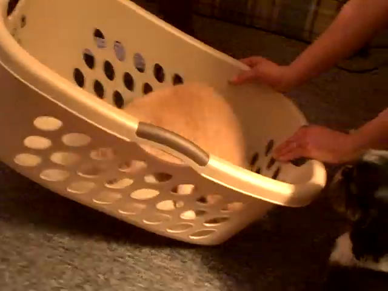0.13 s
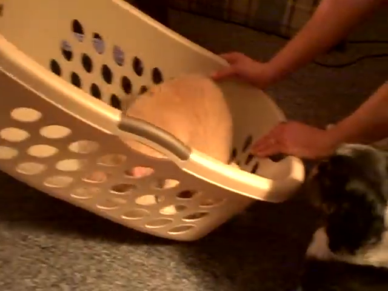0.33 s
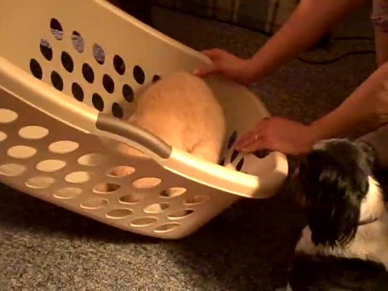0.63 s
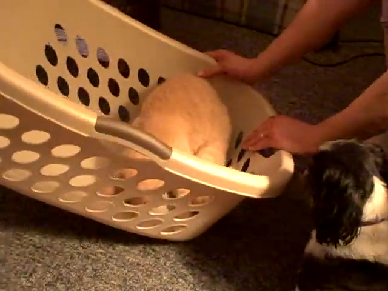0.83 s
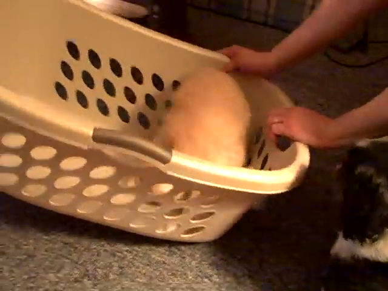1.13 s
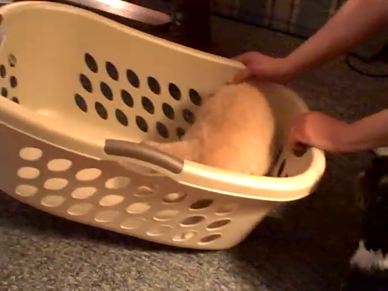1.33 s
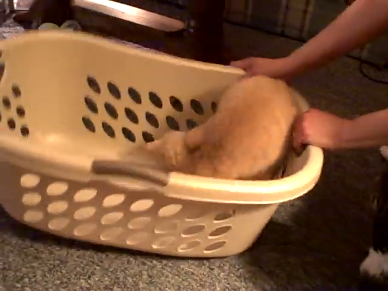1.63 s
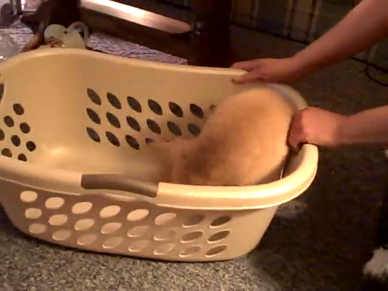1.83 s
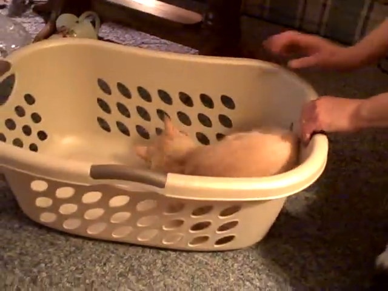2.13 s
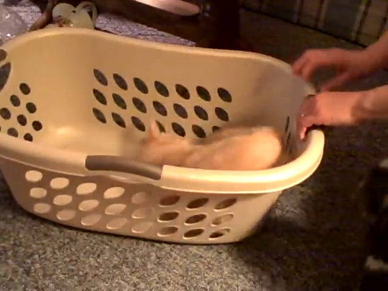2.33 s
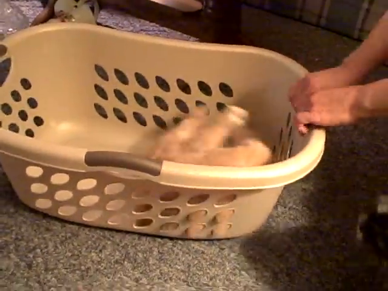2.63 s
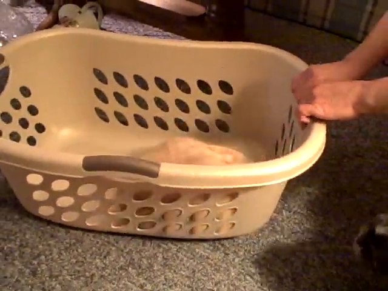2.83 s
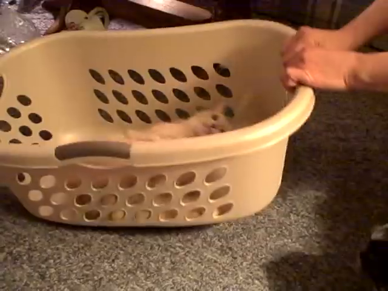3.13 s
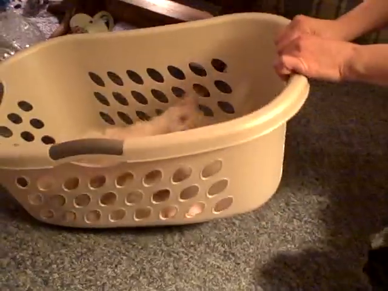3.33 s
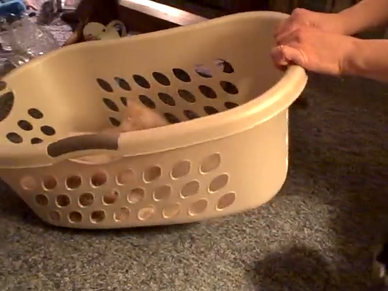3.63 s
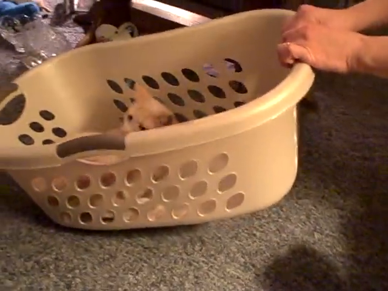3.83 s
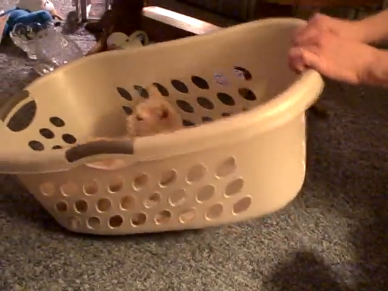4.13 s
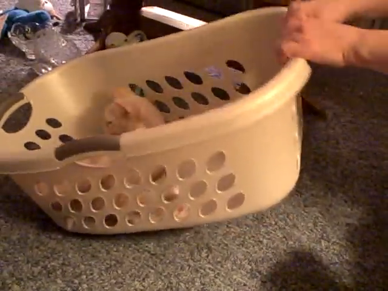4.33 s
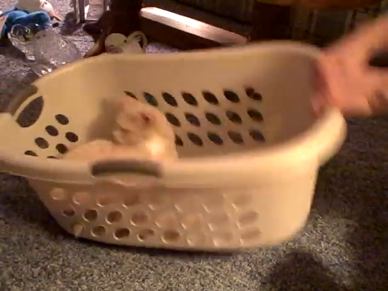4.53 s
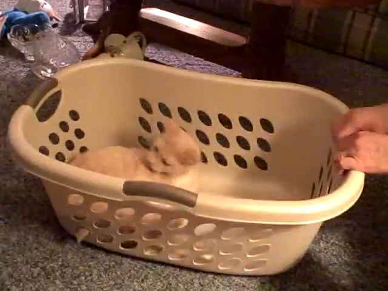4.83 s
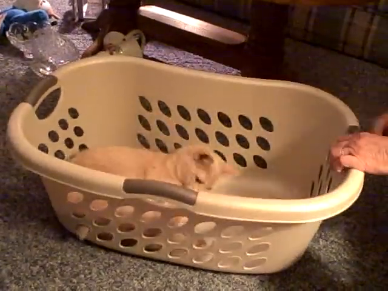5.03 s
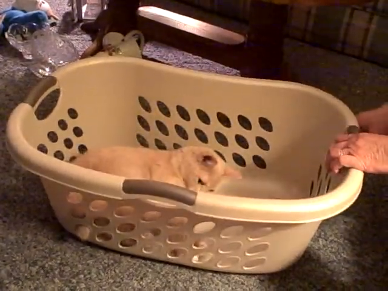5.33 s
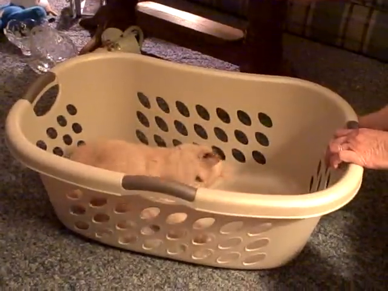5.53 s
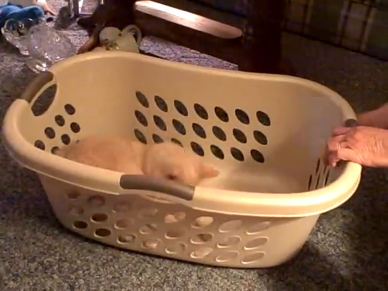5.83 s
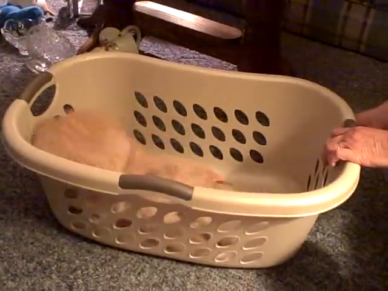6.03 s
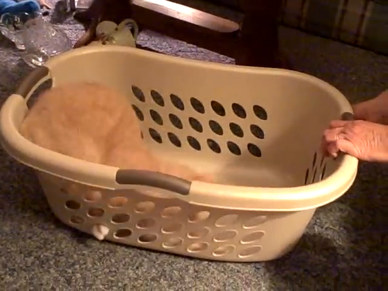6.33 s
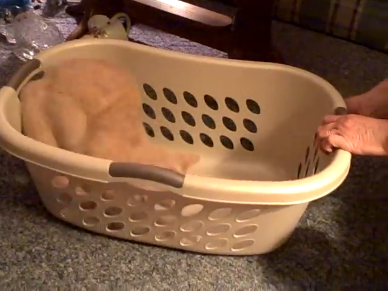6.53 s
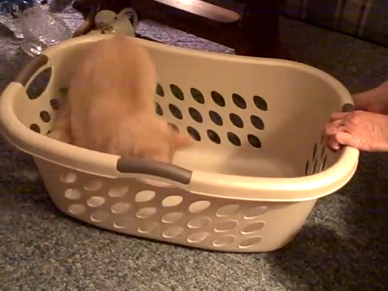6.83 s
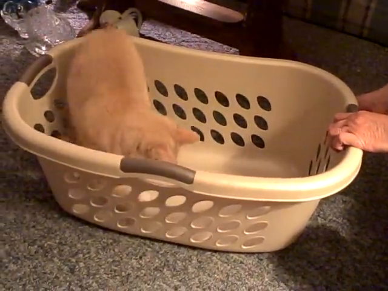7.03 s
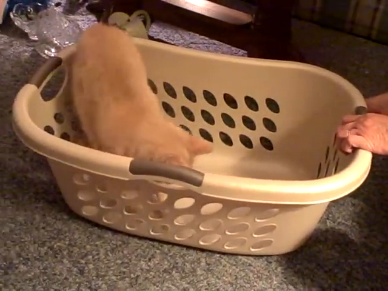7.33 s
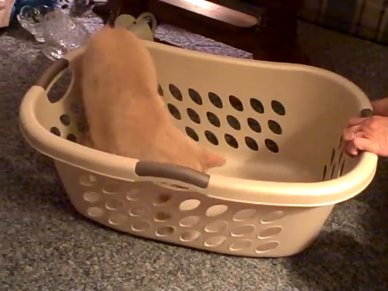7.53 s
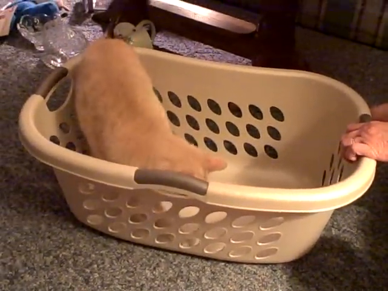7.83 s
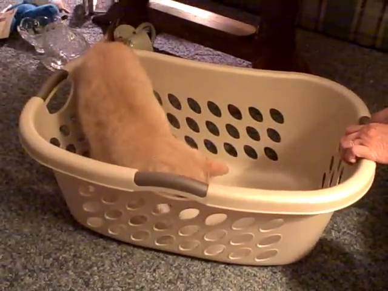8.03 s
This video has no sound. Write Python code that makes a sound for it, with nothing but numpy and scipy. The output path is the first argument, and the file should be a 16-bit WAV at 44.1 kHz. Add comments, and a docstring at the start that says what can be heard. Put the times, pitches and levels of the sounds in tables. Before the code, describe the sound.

A cat slides and scrabbles inside a hollow plastic laundry basket on carpet, soft brushing at first, then thickening claw scratches and knocks.

```python
"""A cat slides and scrabbles in a plastic laundry basket on a carpet, in a quiet room.
Low rumble and faint hiss run throughout. First fur slides in strokes of tiny slips, with scattered claw catches,
soft thuds and, from 2 s, slow deep heaves. After a sparser stretch near 4 s the scrabbling thickens from 5.3 s to
the end: claws tick and ring the wall modes, panels knock at three pitches, hard drags squeak as gliding noise bands.
A short room tail follows the contacts; a small microphone with a bright treble peak picks everything up."""
import sys
import numpy as np
from scipy import signal
from scipy.fft import rfft, irfft
from scipy.io import wavfile
from scipy.ndimage import uniform_filter1d, map_coordinates

SR = 44100
rng = np.random.default_rng(int(sys.argv[2]) if len(sys.argv) > 2 else 0)


def put_to_file(sound):
    """Save the sound as 16-bit audio at rate SR, in the file named by the first command-line argument."""
    columns = np.atleast_2d(sound).T  # one column per channel
    safe = np.clip(columns, -1, 1)
    whole_steps = np.round(safe * 32767)
    wavfile.write(sys.argv[1], SR, whole_steps.astype(np.int16))


N = 360738
TIME = np.arange(N) / SR

# claws catching on the plastic: t/s, relative tick level/dB, relative wall ring level/dB, slip length/s,
# favoured f of the spot/Hz
CLAW_CATCHES = [(0.5468, -38, -38.5, 0.0015, 1900), (1.159, -38, -60, 0.0019, 1592),
                (1.479, -41.5, -44, 0.0015, 2200), (1.96, -31, -67, 0.0092, 2520),
                (2.019, -43, -43, 0.0044, 1200), (2.612, -40.5, -46, 0.0037, 1700),
                (4.706, -54, -44, 0.0017, 1298), (5.294, -47, -42, 0.0041, 897),
                (5.376, -48.5, -44, 0.0046, 800), (5.388, -32, -38, 0.0133, 2000),
                (5.646, -23, -38.5, 0.0014, 1600), (5.664, -31.5, -39.5, 0.0023, 1100),
                (5.731, -42, -51, 0.0032, 1787), (5.812, -34, -45, 0.0059, 905),
                (5.969, -41, -46.5, 0.0012, 1600), (6.021, -34, -39, 0.0015, 1032),
                (6.113, -32, -51, 0.0013, 2640), (6.149, -47, -43, 0.0031, 1920),
                (6.203, -48, -46, 0.0011, 1200), (6.275, -46, -45, 0.00185, 1750),
                (6.322, -33, -56, 0.0013, 2600), (6.394, -34, -36, 0.0042, 1560),
                (6.469, -47, -44.5, 0.006, 2250), (6.523, -31, -65, 0.0088, 1574),
                (6.588, -40, -43, 0.00114, 650), (6.862, -39, -47, 0.0055, 2180),
                (6.953, -22, -26, 0.0039, 1900), (6.964, -21, -33, 0.00337, 2500),
                (7.028, -30, -60, 0.0044, 1480), (7.19, -33.5, -42, 0.0011, 1300),
                (7.223, -28, -34, 0.0062, 2330), (7.238, -32.5, -36.5, 0.005, 2400),
                (7.403, -33, -38.5, 0.0023, 900), (7.434, -32.5, -40.5, 0.0022, 1372),
                (7.521, -20, -30.5, 0.005, 2200), (7.648, -38, -55, 0.002, 2020),
                (7.749, -31.5, -34, 0.0056, 2066), (8.005, -44, -42.5, 0.0031, 1100),
                (8.036, -49, -42.5, 0.00084, 700), (8.1269, -22, -44.5, 0.0041, 2695)]
# blunt blows on a panel: t/s, relative level/dB, low ring f/Hz, middle ring f/Hz, high ring f/Hz,
# step of each ring against the one below/dB
PANEL_KNOCKS = [(0.547, -36, 670, 1660, 1910, 2.5), (4.689, -46, 760, 1220, 1500, 6),
                (5.295, -41.5, 323, 502, 870, 3.5), (6.021, -39.5, 750, 1190, 1508, 1.5),
                (6.9533, -22.5, 793.7, 1370, 1750, -0.5), (6.964, -34.5, 790, 1426, 2420, 6),
                (7.224, -35, 1913, 2560, 3800, 3), (7.2398, -32, 856, 1310, 1810, 3.5),
                (7.5232, -26, 1296, 2200, 3940, 4), (8.128, -25.5, 1780, 2560, 3950, 4)]
# surface scrape spectrum: f/Hz, relative level/dB
SCRAPE_SPECTRUM = [(100, -5), (400, -6.5), (1000, -11), (2000, -4), (3200, -2.5), (4500, 2), (6500, 3),
                   (9000, -2.5)]
SHIFTING_HZ = 1720  # favoured pitch of the wall the cat leans on


def undb(db):
    """Decibels to gain."""
    return 10 ** (np.asarray(db) / 20)


def unit(x):
    """Scale to rms 1."""
    return x / np.sqrt(np.mean(x ** 2))


def unit_energy(x):
    """Scale so that the squares sum to 1."""
    return x / np.sqrt(np.sum(x ** 2))


def add(out, start_s, x):
    """Mix x into out from start_s."""
    start = int(np.clip(start_s * SR, 0, N - 1))
    out[start:start + len(x)] += x[:N - start]


def colour(x, spectrum, size=8192):
    """Minimum-phase filter through (Hz, dB) points, built from the cepstrum."""
    hz, db = np.transpose(spectrum)
    bins_hz = np.arange(size // 2 + 1) * SR / size
    response_db = np.interp(np.log(bins_hz + 1), np.log(hz), db)
    cepstrum = irfft(np.log(undb(response_db)))[:size // 2]
    cepstrum[1:] *= 2  # fold to causal
    impulse = irfft(np.exp(rfft(cepstrum, size)))[:size // 2]
    return signal.fftconvolve(x, impulse)[:len(x)]


def walk(rate_hz):
    """Random levels drawn at rate_hz, slewed from one to the next; rms 1."""
    hold = int(SR / rate_hz)
    steps = np.repeat(rng.standard_normal(N // hold + 1), hold)
    return unit(uniform_filter1d(steps, hold)[:N])


def fade(t60_s, size=12000):
    """Exponential decay at 60 dB per t60_s, cut after size samples."""
    return np.exp(-np.log(1000) * TIME[:size] / t60_s)


def ring(modes, scatter_db, detune):
    """Sum of damped modes; every contact weights, detunes and signs them at random."""
    out = 0
    draws = rng.standard_normal((len(modes), 3))
    for (hz, db, t60_s), (size, stretch, side) in zip(modes, draws):
        decay = fade(t60_s)
        bent_hz = hz * (1 + detune * stretch)
        gain = np.sign(side) * undb(db + scatter_db * size)
        out = out + gain * decay * np.sin(2 * np.pi * bent_hz * TIME[:len(decay)])
    return unit_energy(out)


def favour(hz, spot_hz, slope_db=6):
    """A spot passes vibration best near its own pitch: gain in dB at hz, slope_db per squared octave, limited."""
    return -slope_db * np.minimum(np.log2(hz / spot_hz) ** 2, 2)


def wall(force, spot_hz, flex_db, scatter_db, damping=1):
    """A force at one spot rings the wall's modes and drives a dense, quickly damped flexing around it."""
    # wall modes: f/Hz, relative level/dB, t60 before damping/s
    wall_modes = [(501, -5.5, 0.38), (573, -6, 0.16), (676, -9, 0.23), (784, -8.5, 0.058),
                  (862, -2.5, 0.18), (987, -11, 0.05), (1260, -4, 0.029), (1440, -2.5, 0.05),
                  (1607, 2, 0.06), (1852, 10, 0.025), (2140, -8.5, 0.05), (2330, -9, 0.037),
                  (2590, -5, 0.047), (2850, -4, 0.057), (3780, 3, 0.019), (4493, -3, 0.049)]
    # wall flexing spectrum: f/Hz, relative level/dB
    shell_spectrum = [(90, -21), (240, -5.5), (380, -1), (750, 5), (1050, 0), (1600, -3), (2600, -1),
                      (4000, 0), (6500, -6.5), (9000, -20.5)]
    spot_modes = [(hz, db + favour(hz, spot_hz), t60_s / damping) for hz, db, t60_s in wall_modes]
    modes = ring(spot_modes, scatter_db, detune=0.013)
    flex = colour(force, [(hz, db + favour(hz, spot_hz)) for hz, db in shell_spectrum])
    ringing = signal.fftconvolve(force, modes)[:len(force)]
    return unit_energy(ringing) + undb(flex_db) * unit_energy(flex)


def rubbing(hiss_db=-1, rasp_db=-1.0, judder_db=1.0, flicker_db=4.5, reach_octaves=0.98, grit_db=-6,
            flutter_db=1.26):
    """Fur and claws slide over the plastic: the slips hiss at the surface and rasp in the walls."""
    hiss_gain, rasp_gain, spot_octaves = contact()
    hiss_gain = hiss_gain * undb(flutter_db * walk(rate_hz=30))
    judder = undb(judder_db * walk(rate_hz=160))
    friction = unit(slips(rate_hz=7000, spread_db=1.5) * judder)
    # claw tips skip in fewer, larger steps than fur
    skips = unit(friction + 0.55 * slips(rate_hz=600, spread_db=5.5))
    # contact wanders over five spots, soft to stiff; pressure on each flickers
    spots_hz = np.geomspace(550, 3000, 5)
    place = spot_octaves + 0.18 * walk(rate_hz=10)
    shares = np.exp(-((place - np.log2(spots_hz)[:, None]) / reach_octaves) ** 2)
    shares /= np.linalg.norm(shares, axis=0)
    walls = np.zeros(N)
    for hz, share in zip(spots_hz, shares):
        pressed = skips * undb(flicker_db * walk(rate_hz=55))
        # the body on the wall damps its modes, so mostly the flexing is heard
        walls += share * unit(wall(pressed, hz, flex_db=1.5, scatter_db=3, damping=2))
    # claw tips tick over scuffs, louder with the rasp
    grit = undb(grit_db) * unit(colour(slips(rate_hz=430, spread_db=6), SCRAPE_SPECTRUM))
    surface = unit(colour(friction, SCRAPE_SPECTRUM))
    return undb(hiss_db) * hiss_gain * surface + undb(rasp_db) * rasp_gain * (bend(walls) + grit)


def slips(rate_hz, spread_db):
    """Stick-slip friction: a random stream of tiny impulses, a few much larger than the rest."""
    sizes = undb(spread_db * np.minimum(rng.exponential(size=N), 4))
    return unit((rng.random(N) < rate_hz / SR) * sizes * rng.choice([-1, 1], N))


def contact():
    """Strokes add in power to a hiss gain and a rasp gain; rasp power weights the spot, in octaves."""
    # light rubbing under all strokes: t/s, surface hiss level/dB, wall rasp level/dB
    shifting = [(0.0, -81.5, -95), (0.45, -62, -77.5), (0.72, -74, -87), (1.1, -59, -74),
                (1.36, -60.5, -67.5), (2.2, -61.5, -70), (3.301, -57.5, -69), (3.75, -63, -75),
                (4.6, -64.5, -72), (4.8, -59.5, -64.5), (5.27, -61.5, -65), (5.451, -48, -52),
                (6.4, -52.5, -58), (6.52, -53, -62), (6.82, -51.5, -61), (6.9, -52, -70), (7.1, -82, -53.5),
                (7.35, -71, -64), (7.8, -43, -62.5), (7.969, -56, -60), (8.18, -41.5, -67)]
    s, *columns = np.transpose(shifting)
    hiss, rasp = (undb(np.interp(TIME, s, column)) ** 2 for column in columns)
    octaves = rasp * np.log2(SHIFTING_HZ)
    for start_s, envelope, hiss_db, rasp_db, spot_hz in strokes():
        power = (undb(rasp_db) * envelope) ** 2
        add(hiss, start_s, (undb(hiss_db) * envelope) ** 2)
        add(rasp, start_s, power)
        add(octaves, start_s, power * np.log2(spot_hz))
    return np.sqrt(hiss), np.sqrt(rasp), octaves / rasp


def strokes():
    """Yield (s, envelope, hiss dB, rasp dB, pitch Hz): slides hold, scratches swell, skids die away."""
    # fur sliding along the plastic: t/s, length/s, relative level/dB
    fur_slides = [(0.007, 0.2112, -46.5), (0.26, 0.052, -52.5), (0.497, 0.062, -57.5), (0.96, 0.04, -47),
                  (1.596, 0.159, -52.5), (1.751, 0.089, -50), (1.815, 0.24, -46), (2.289, 0.062, -56),
                  (2.471, 0.13, -43), (2.614, 0.36, -52.5), (2.855, 0.19, -45), (3.04, 0.18, -47.5),
                  (3.213, 0.17, -47), (3.362, 0.23, -50), (3.58, 0.0665, -54.5), (4.263, 0.26, -55),
                  (4.757, 0.13, -52.5), (5.544, 0.036, -36.5), (6.304, 0.15, -38.5), (6.653, 0.11, -41),
                  (6.746, 0.046, -38.5), (6.957, 0.1, -33), (7.215, 0.21, -41), (7.436, 0.096, -45),
                  (7.629, 0.16, -35.5), (7.778, 0.12, -45), (7.99, 0.14, -42.5)]
    # strokes of a paw: t/s, length/s, surface hiss level/dB, wall rasp level/dB, favoured f of the spot/Hz
    paw_strokes = [(0.538, 0.07, -49.5, -49, 1600), (0.787, 0.078, -53, -52, 1200),
                   (1.102, 0.045, -43.5, -58, 2500), (1.154, 0.0545, -42.5, -47.5, 2680),
                   (1.232, 0.073, -58, -57.5, 1505), (1.476, 0.024, -44, -58, 1910),
                   (2.49, 0.133, -42.5, -52, 2300), (2.907, 0.1368, -42, -74, 2110),
                   (4.333, 0.25, -71, -61.5, 1150), (4.675, 0.077, -72.5, -59, 1206),
                   (4.994, 0.038, -44, -74, 2475), (5.057, 0.09, -50.5, -61, 2400),
                   (5.335, 0.043, -64, -40, 1490), (5.365, 0.067, -35.5, -36.5, 1500),
                   (5.789, 0.094, -65, -47, 943), (5.919, 0.088, -42.5, -48, 1598),
                   (5.986, 0.072, -41, -46, 1100), (6.098, 0.06, -40, -48, 1960),
                   (6.229, 0.051, -47, -52, 997), (6.374, 0.0405, -57.5, -48, 1575),
                   (6.518, 0.0232, -43, -65, 1568), (6.573, 0.068, -42.5, -53.5, 547),
                   (6.822, 0.029, -39, -57, 2006), (7.101, 0.035, -42, -51, 1200),
                   (7.174, 0.027, -41, -45, 1400), (7.231, 0.034, -36, -38, 1393),
                   (7.452, 0.16, -50.5, -44, 1410), (7.699, 0.077, -43, -45, 2060)]
    attack_s, release_s, sag_db, slide_rasp_db = 0.022, 0.022, -2, -17  # release is a time constant
    peak_share, steepness = 0.37, 2.46  # where in its length a stroke presses hardest; how narrowly
    skid_hiss_db, skid_rasp_db, skid_t60_s = -11, -10.5, 0.13  # levels against the wall ring or knock
    t = TIME[:SR]
    for s, length_s, db in fur_slides:
        held = np.minimum(t / attack_s, 1) * undb(sag_db * t / length_s)
        envelope = held * np.exp(-np.maximum(t - length_s, 0) / release_s)
        yield s, envelope, db, db + slide_rasp_db, SHIFTING_HZ
    for s, length_s, hiss_db, rasp_db, spot_hz in paw_strokes:
        progress = t / (peak_share * length_s)
        yield s, (progress * np.exp(1 - progress)) ** steepness, hiss_db, rasp_db, spot_hz
    # a claw that lets go skids on
    for s, _, ring_db, length_s, spot_hz in CLAW_CATCHES:
        yield s + length_s, fade(skid_t60_s), ring_db + skid_hiss_db, ring_db + skid_rasp_db, spot_hz
    for s, db, _, middle_hz, _, _ in PANEL_KNOCKS:
        yield s, fade(skid_t60_s), db + skid_hiss_db, db + skid_rasp_db, middle_hz


def bend(x, depth=0.05):
    """The thin wall bends under the shifting cat: a wandering delay drifts its resonances by a few percent."""
    drift = np.cumsum(depth * walk(rate_hz=10))  # samples
    return map_coordinates(x, [np.arange(N) + drift], mode="mirror")


def claws(tick_db=23, knock_db=24, grip_db=2, snap=4, flex_t60_s=0.018, flex_share=0.14):
    """A claw catches and lets go in milliseconds of chatter, which ticks and sets the wall ringing."""
    ticks, wall_rings = np.zeros(N), np.zeros(N)
    shiver = flex_share * fade(flex_t60_s)
    for s, sharp_db, ring_db, length_s, spot_hz in CLAW_CATCHES:
        count = max(int(length_s * SR), 8)
        chatter = rng.standard_normal(count) * undb(grip_db * rng.standard_normal(count))
        chatter[0] = snap  # strong first touch
        add(ticks, s, undb(sharp_db + tick_db) * unit_energy(chatter))
        # bending waves come back from the holes and the rim
        returns = np.append(1, shiver * rng.standard_normal(len(shiver)))
        force = signal.fftconvolve(chatter, returns)
        knock = wall(force, spot_hz, flex_db=3.5, scatter_db=1.5)
        add(wall_rings, s, undb(ring_db + knock_db) * unit_energy(knock))
    return colour(ticks, SCRAPE_SPECTRUM) + wall_rings


def knocks(knock_db=24, ring_cycles=32, echo_db=-5, echo_t60_s=0.12, rest_db=-12):
    """A bumped panel rings at three pitches; the ring runs round the basket and shakes the rest of the wall."""
    out = np.zeros(N)
    decay = fade(echo_t60_s)
    for s, db, *pitches_hz, step_db in PANEL_KNOCKS:
        # ring_cycles: cycles per 60 dB of decay
        modes = [(hz, k * step_db, ring_cycles / hz) for k, hz in enumerate(pitches_hz)]
        panel = ring(modes, scatter_db=0.5, detune=0.005)
        returns = unit_energy(decay * rng.standard_normal(len(decay)))
        echo = unit_energy(signal.fftconvolve(panel, returns)[:len(panel)])
        rest = unit_energy(wall(returns, pitches_hz[1], flex_db=3.5, scatter_db=1.5))
        blow = panel + undb(echo_db) * echo + undb(rest_db) * rest
        add(out, s, undb(db + knock_db) * unit_energy(blow))
    return out


def squeaks():
    """Each hard drag swells and fades while its pitch glides with the speed of the paw."""
    # squeaks and groans of a claw or pad: t/s, length/s, peak level/dB, first f/Hz, last f/Hz, bandwidth/Hz
    drags = [(2.481, 0.092, -50, 2020, 2110, 320), (5.11, 0.1, -56, 138, 185, 40),
             (5.338, 0.05, -37.5, 1788, 1955, 600), (6.239, 0.051, -56, 1338, 1063, 90),
             (6.335, 0.05, -51, 2020, 1720, 110), (6.422, 0.014, -43.5, 1430, 1520, 90),
             (7.474, 0.045, -47.5, 1480, 1596, 160)]
    out = np.zeros(N)
    for s, length_s, db, first_hz, last_hz, width_hz in drags:
        progress = np.linspace(0, 1, int(length_s * SR))
        hz = first_hz * (last_hz / first_hz) ** progress
        add(out, s, undb(db) * np.sin(np.pi * progress) * squeak(hz, width_hz))
    return out


def squeak(hz, width_hz):
    """The slips bunch loosely around one rate: a narrow, hoarse noise band that follows the pitch curve hz."""
    blur = signal.butter(2, width_hz / 2, fs=SR, output="sos")
    real, imaginary = signal.sosfilt(blur, rng.standard_normal((2, len(hz))))
    phase = 2 * np.pi * np.cumsum(hz) / SR
    return unit(real * np.cos(phase) + imaginary * np.sin(phase))


def thuds(thud_db=25, pad_t60_s=0.11, pad_db=-1, pad_spread=1.73, slap_db=0, slap_t60_s=0.0066,
          slap_ratio=1.62):
    """Soft pushes slap and ring the basket's bottom, and the carpet under it gives with a dull puff."""
    # blows of paws, body and basket bottom: t/s, relative level/dB, favoured f of the spot/Hz
    blows = [(0.141, -51, 357), (2.021, -42, 334), (2.036, -40.5, 120), (2.864, -48, 290),
             (3.381, -50, 256), (4.699, -45.5, 223), (4.771, -52.5, 110), (5.293, -48.5, 301),
             (5.542, -45, 200), (5.725, -46.5, 283), (5.809, -48.5, 290), (5.948, -50, 279.6),
             (6.015, -41, 319), (6.147, -44.5, 245), (6.587, -33, 336), (6.777, -49, 284),
             (7.234, -44.5, 230), (7.523, -45, 245), (8.006, -45, 203), (8.035, -38.5, 257.7)]
    # basket bottom modes: f/Hz, relative level/dB, t60/s
    bottom_modes = [(128, 0, 0.17), (161.7, 0, 0.16), (220, -6.5, 0.022), (258.38, 3, 0.28),
                    (292, -10.5, 0.058), (486, -9.5, 0.079), (562, -1.5, 0.2)]
    nudge_db, nudge_hz = -16, 302  # paw of each catching claw: level against the wall ring, favoured pitch
    nudges = [(s, ring_db + nudge_db, nudge_hz) for s, _, ring_db, _, _ in CLAW_CATCHES]
    out = np.zeros(N)
    give = fade(pad_t60_s)
    for s, db, spot_hz in blows + nudges:
        spot_modes = [(hz, gain_db + favour(hz, spot_hz), t60_s) for hz, gain_db, t60_s in bottom_modes]
        body = ring(spot_modes, scatter_db=5.5, detune=0.027)
        band_hz = spot_hz * max(pad_spread, 1.1) ** np.array([-1, 1])
        dull = signal.butter(2, band_hz, "bandpass", fs=SR, output="sos")
        pad = unit_energy(signal.sosfilt(dull, give * rng.standard_normal(len(give))))
        # the weight on the spot stops its swing after a cycle or two
        slap = ring([(slap_ratio * spot_hz, 0, slap_t60_s)], scatter_db=0, detune=0)
        thud = body + undb(pad_db) * pad + undb(slap_db) * slap
        add(out, s, undb(db + thud_db) * unit_energy(thud))
    return out


def heaves(low_hz=20, high_hz=38):
    """The whole load wobbles slowly and settles after each shift of weight."""
    # deep heaves: t/s, peak level/dB, length/s
    weight_shifts = [(1.963, -40.5, 0.38), (2.61, -48, 0.2), (4.72, -40.5, 0.25), (5.638, -44.5, 0.62),
                     (6.566, -40, 0.33)]
    band = signal.butter(4, [low_hz, high_hz], "bandpass", fs=SR, output="sos")
    noise = signal.sosfilt(band, rng.standard_normal(N))
    wobble = np.cos(np.angle(signal.hilbert(noise)))  # band noise of constant amplitude
    swell = np.zeros(N)
    for s, db, length_s in weight_shifts:
        progress = np.clip((TIME - s) / length_s, 0, 1)
        swell += undb(db) * np.sin(np.pi * progress ** 0.53)  # early peak
    return wobble * swell


def room(x, wet_db=-10, t60_s=0.29, first_echo_s=0.0081, dull_hz=4500):
    """A carpeted room adds a short, diffuse tail with softened treble."""
    decay = fade(t60_s)
    late = TIME[:len(decay)] > first_echo_s
    tail = unit_energy(decay * rng.standard_normal(len(decay)) * late)
    tail = signal.sosfilt(signal.butter(1, dull_hz, fs=SR, output="sos"), tail)
    return x + undb(wet_db) * signal.fftconvolve(x, tail)[:N]


def background(floor_db=-54, waver_db=0.1):
    """Low rumble of the house and a faint, nearly steady hiss, as coloured noise."""
    # room tone spectrum: f/Hz, relative level/dB
    room_tone = [(15, -0.5), (30, 2.5), (48, -13.5), (86, -7.5), (115, -14.5), (260, -17.5), (420, -26),
                 (1100, -30.5), (3000, -35), (7300, -48.5), (7700, -23.5), (8000, -32.5)]
    level = undb(floor_db + waver_db * walk(rate_hz=4.056))
    return level * unit(colour(rng.standard_normal(N), room_tone))


def scene():
    """The basket in the room, with its heaves, over the background."""
    basket = rubbing() + squeaks() + claws() + knocks() + thuds()
    return (room(basket) + heaves() + background())[None]


def record(dry, ceiling=0.55, top_hz=8900):
    """The small microphone rings in the treble; the recorder rounds the loudest peaks and cuts the top."""
    # microphone response: f/Hz, gain/dB
    microphone = [(20, 0), (3500, -1), (4900, 0.5), (5800, 5), (6550, 9.5), (7200, 5), (7700, -1),
                  (8050, -9), (8500, -9.5), (9200, -34)]
    lowpass = signal.ellip(8, .2, 70, top_hz, fs=SR, output="sos")
    rounded = ceiling * np.tanh(colour(dry[0], microphone) / ceiling)
    return signal.sosfilt(lowpass, rounded)[None]


dry = scene()
out = record(dry)
put_to_file(out)
```